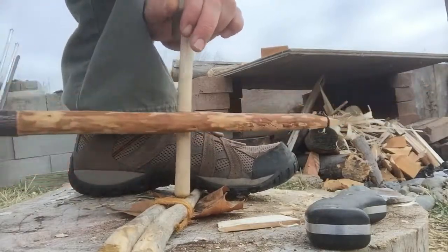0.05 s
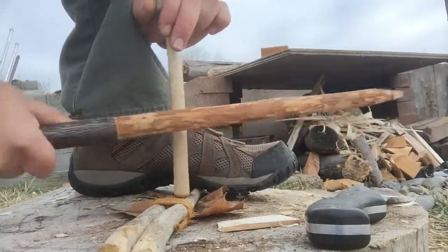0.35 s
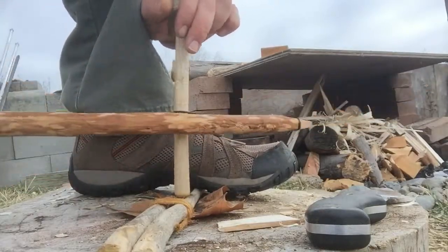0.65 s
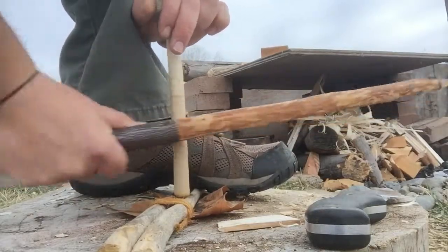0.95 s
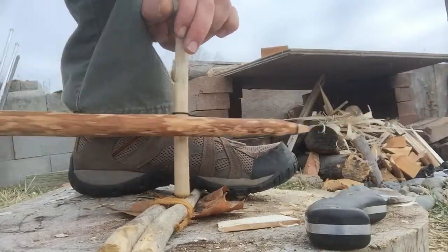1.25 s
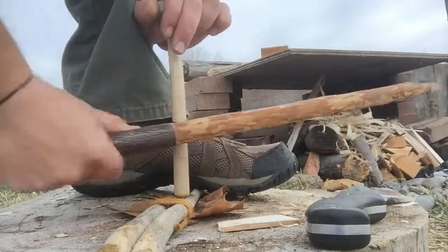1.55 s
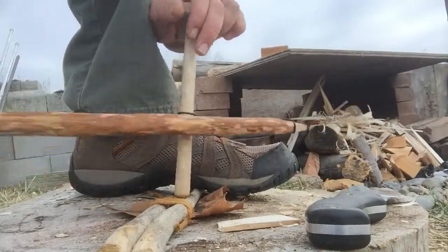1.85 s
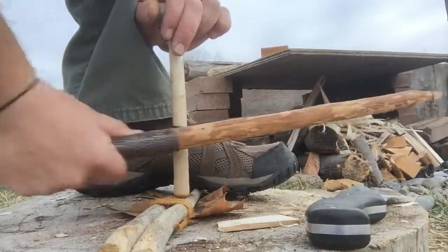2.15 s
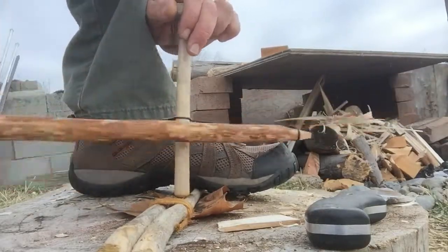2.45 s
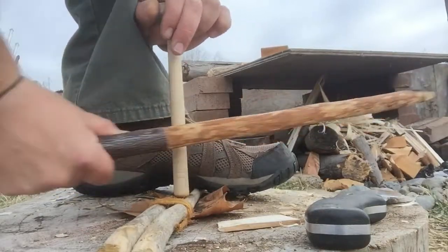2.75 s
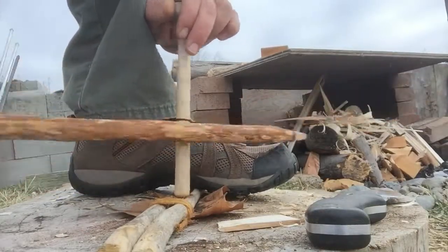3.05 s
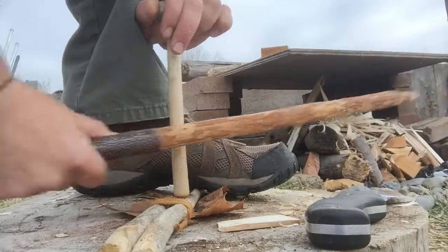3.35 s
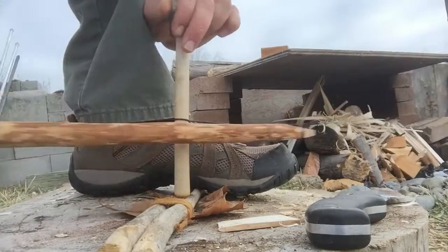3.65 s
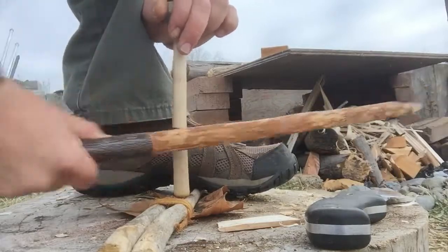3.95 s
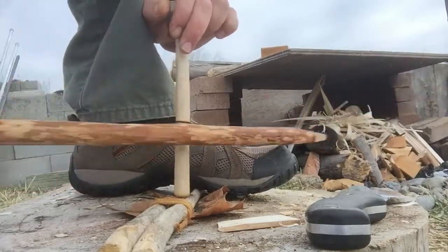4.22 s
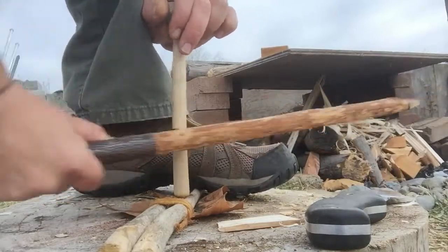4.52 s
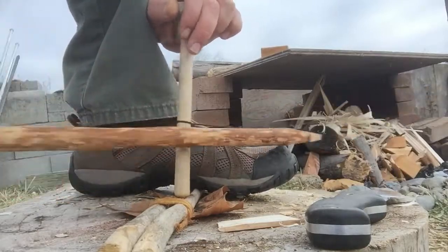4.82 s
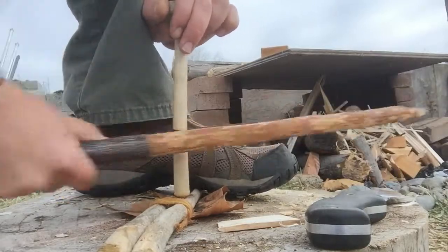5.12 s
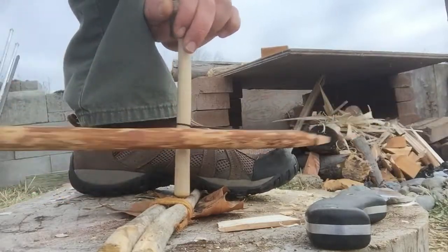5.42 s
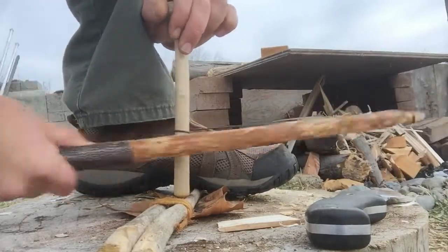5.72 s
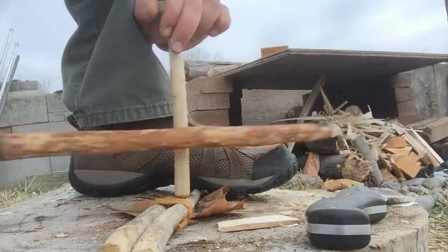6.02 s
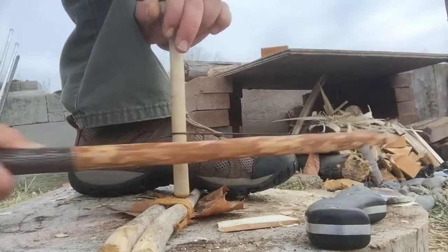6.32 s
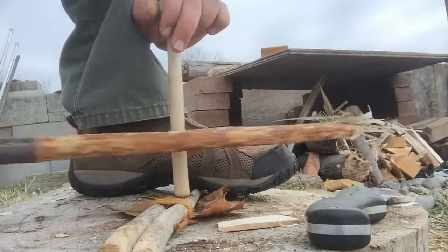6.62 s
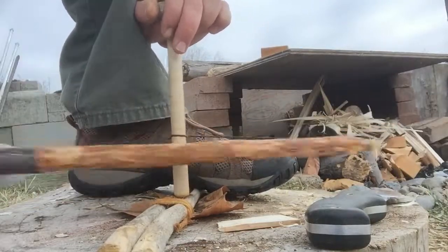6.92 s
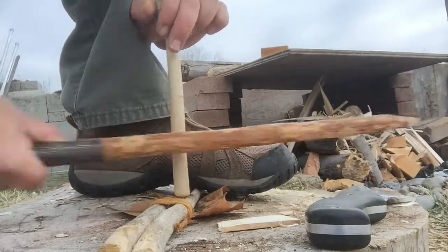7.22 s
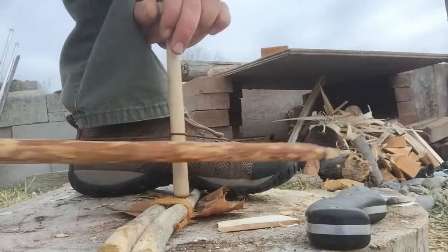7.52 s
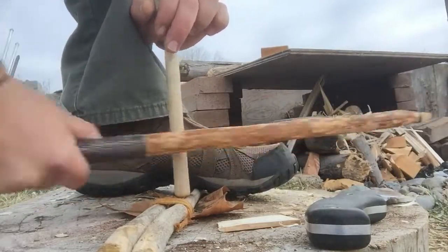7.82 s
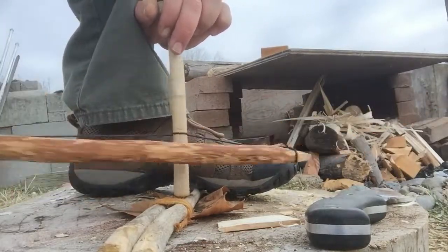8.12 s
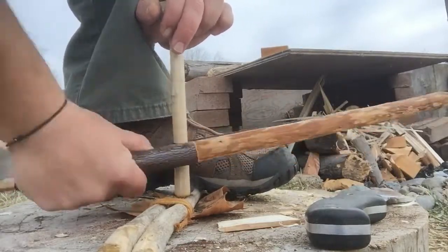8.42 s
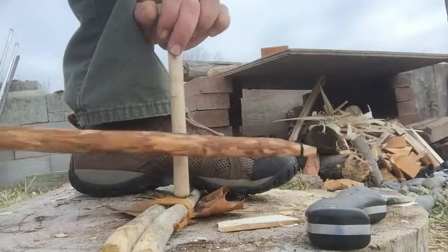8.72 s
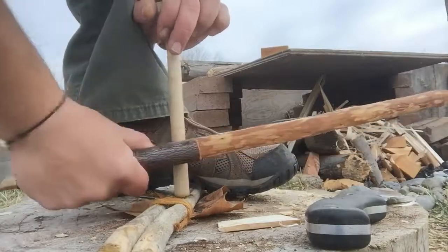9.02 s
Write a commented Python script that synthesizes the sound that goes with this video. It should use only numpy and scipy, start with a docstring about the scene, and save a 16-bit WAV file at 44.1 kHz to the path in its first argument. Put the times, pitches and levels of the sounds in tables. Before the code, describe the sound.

Close, rhythmic rasping of wood spinning on wood, with sharp squeaks that thin out and a few knocks, over faint open-air rumble.

```python
"""A bow drill, close by, over the faint low rumble of the open air. A wooden spindle starts to grind to and
fro in its board, about 3.4 strokes a second: pushes bear down harder, pulls add a soft hollow note.
At first the smooth socket squeals as the tip sticks and slips, and the drill knocks at a few turns of
the bow. Within two seconds the socket wears in to a louder, dry rasp, and the tip begins to catch.
Near 4 s the drill groans in its seat; then the squeaks thin out, and a last knock comes at 6.6 s."""
import sys
import numpy as np
from scipy import signal
from scipy.fft import rfft, irfft, next_fast_len
from scipy.io import wavfile
from scipy.ndimage import uniform_filter1d

SR = 44100
rng = np.random.default_rng(int(sys.argv[2]) if len(sys.argv) > 2 else 0)


def persist_wave(psi):
    """Save psi, clipped to +-1, as 16-bit WAV."""
    counts = np.round(np.clip(psi, -1, 1) * 32767).astype(np.int16)
    wavfile.write(sys.argv[1], SR, np.atleast_2d(counts).T)


N = 408807
TIME = np.arange(N) / SR
FFT_SIZE = next_fast_len(N + SR // 4, True)
HZ = np.fft.rfftfreq(FFT_SIZE, 1 / SR)
HIGHEST_HZ = 15950
WEAR_IN_S = 1.18  # how long the fresh socket takes to wear in


def gain_of(db):
    """Turns decibels into a number to multiply by."""
    return 10 ** (np.asarray(db) / 20)

def unit_level(x):
    """Scales a signal to an average (rms) level of 1."""
    return x / np.sqrt(np.mean(x ** 2) + 1e-20)

def curve_db(points):
    """Joins (frequency, level) points into a level for every frequency."""
    f, db = np.transpose(points)
    return np.interp(np.log(HZ + 1), np.log(f + 1), db)

def filtered(x, gain):
    """Turns each frequency up or down by its own gain."""
    return irfft(rfft(x, FFT_SIZE) * gain, FFT_SIZE)[:N]

def noise(gain):
    """Noise of level 1, coloured by a gain for each frequency."""
    return unit_level(filtered(rng.standard_normal(N), gain))

def bell(x, centre, width):
    """A smooth hump of height 1."""
    return np.exp(-np.minimum(((x - centre) / width) ** 2, 20))

def drift(rate):
    """A random wobble of level 1, up to about `rate` times a second."""
    smoothing = signal.butter(2, min(rate, 900), fs=SR / 20, output="sos")
    coarse = signal.sosfilt(smoothing, rng.standard_normal(N // 20 + 2))
    return np.interp(np.arange(N) / 20, np.arange(len(coarse)), unit_level(coarse))

def resonate(x, hz, width):
    """Makes a signal ring at a pitch that follows the curve hz."""
    turn = np.exp(2j * np.pi * np.cumsum(hz) / SR)
    decay = np.exp(-np.pi * width / SR)
    return 2 * (turn * signal.lfilter([1 - decay], [1, -decay], x / turn)).real

def add(mix, s, sound):
    """Mixes a sound in at s seconds."""
    part = mix[max(round(s * SR), 0):][:len(sound)]
    part += sound[:len(part)]


# tone colour of the outdoor rumble and hiss: f/Hz, relative level/dB
RUMBLE_COLOUR = [(15, -50.5), (25, -14), (56, 0), (76, 3.5), (123, -2), (206, -17), (260, -26.5),
                 (340, -56), (570, -120)]
HISS_COLOUR = [(100, -5.5), (250, 2), (700, -6), (1500, -6), (4000, -14.5), (9000, -21), (16000, -28.5)]

def open_air(rumble_db=-56.5, hiss_db=-67, lowest_hz=36):
    """The distance rumbles softly under a faint, dull hiss."""
    bass_cut = 1 / (1 + (lowest_hz / (HZ + 1)) ** 6)
    rumble = noise(bass_cut * gain_of(curve_db(RUMBLE_COLOUR)))
    hiss = noise(bass_cut * gain_of(curve_db(HISS_COLOUR)))
    return gain_of(rumble_db + drift(8)) * rumble + gain_of(hiss_db) * hiss


# knocks as the bow turns: t/s, peak level/dB, treble/dB, scrape length/s, scrape against blow/dB
KNOCKS = [(0.058, -52, 1, 0.002, -6), (0.694, -27.5, 4, 0.0048, 3), (1.31, -24, -2.5, 0.0037, -6),
          (3.088, -35.5, -13, 0.002, -24), (6.590, -21, -17, 0.0011, -26)]
# notes the board rings with: f/Hz, relative level/dB, time to fade by 60 dB/s
BOARD_NOTES = [(244.4, -9.5, 0.035), (407, -3.5, .022), (660, 0.5, 0.037), (870, 7, 0.024),
               (1070, -2.5, 0.028), (1230, -2, 0.017), (1970, -0.5, 0.034), (2374, 8.5, .016),
               (3100, 5, 0.017), (3430, 2, 0.024), (5740, 6.5, 0.0143), (6016, 4.5, 0.016),
               (7200, -10, .02), (8720, -22, .02)]

def knocks(crack_db=-7):
    """A blow with a short scrape sets the board ringing."""
    out, t = np.zeros(N), np.arange(SR // 5) / SR
    for s, db, treble_db, scrape_s, scrape_db in KNOCKS:
        scrape = rng.standard_normal(len(t)) * bell(t, scrape_s, 2 * scrape_s)
        blow = gain_of(scrape_db) * scrape + (t == 0)
        ring = np.zeros(len(t))
        for k, (hz, note_db, fade_s) in enumerate(BOARD_NOTES):
            fade = gain_of(note_db + treble_db * (hz > 1500) - 60 * t / fade_s)
            ring += (-1) ** k * fade * np.sin(2 * np.pi * hz * t)
        crack = gain_of(crack_db + treble_db) * unit_level(scrape)
        knock = unit_level(signal.fftconvolve(blow, ring)[:len(t)]) + crack
        add(out, s, gain_of(db) * knock / abs(knock).max())
    return out


# bow strokes, push and pull by turns: start t/s, end t/s, timing (under 1 = fastest early), effort/dB
STROKES = [(0.061, 0.358, 1.3, 0), (0.386, 0.696, 0.7, 0.5), (0.68, 0.982, 1.27, 2.5),
           (0.947, 1.291, 1.23, 0), (1.277, 1.568, 1.42, 2), (1.587, 1.929, 0.71, -0.5),
           (1.875, 2.165, 1.22, 1), (2.178, 2.489, 0.95, 1), (2.504, 2.762, 1.03, 3),
           (2.789, 3.072, 0.81, .5), (3.112, 3.363, 0.74, 2.8), (3.379, 3.669, 0.72, 0),
           (3.688, 3.957, .85, 1), (3.952, 4.285, 0.73, -0.9), (4.225, 4.531, 1.03, -0.5),
           (4.517, 4.825, 0.98, -0.6), (4.856, 5.105, 0.88, 1), (5.112, 5.407, 1.02, 0.5),
           (5.456, 5.716, 0.65, 0), (5.711, 5.995, 0.89, -.5), (6.043, 6.295, 0.73, -0.8),
           (6.294, 6.559, 1.045, 1), (6.589, 6.87, 0.81, 0), (6.854, 7.13, 1.14, 1),
           (7.15, 7.417, 0.92, 0.1), (7.431, 7.702, 0.9, 0.5), (7.702, 7.976, 0.96, -0.5),
           (7.974, 8.249, 1.31, 0.5), (8.282, 8.524, 0.8, 1), (8.542, 8.803, 0.98, 0.5),
           (8.848, 9.078, 0.8, 1.3), (9.093, 9.387, 0.85, 1)]
PUSHES, PULLS = STROKES[::2], STROKES[1::2]

def bow_motion(strokes):
    """The spindle's speed (0 to 1) rises and falls once a stroke; also gives the effort in dB."""
    speed, effort_db = np.zeros((2, N))
    for start, end, timing, db in strokes:
        now = (TIME > start) & (TIME < end)
        progress = (TIME[now] - start) / (end - start)
        speed[now] = np.sin(np.pi * progress ** timing)
        effort_db[now] = db
    return speed, effort_db

def freshness(s):
    """The socket at s seconds: 1 = fresh and smooth, 0 = worn in."""
    return bell(s, 0, WEAR_IN_S)

def grit(snaps_per_s=4200, spread_db=2.5, snap_share=0.39):
    """Fibres tear in countless tiny snaps over the smooth hiss of wood dust."""
    snaps = (rng.random(N) < snaps_per_s / SR) * rng.choice([-1, 1], N)
    snaps = snaps * gain_of(spread_db * np.minimum(rng.exponential(1, N), 4))
    return np.sqrt(snap_share) * unit_level(snaps) + np.sqrt(1 - snap_share) * rng.standard_normal(N)

def wandering_tip(x, slow_db=2.13, quick_db=3.0):
    """The tip wanders in its socket, so the tone changes from stroke to stroke and turn to turn."""
    spectra = signal.stft(x, nperseg=512, noverlap=384)[2]
    slow, quick = rng.standard_normal((2, *spectra.shape))
    slow = unit_level(uniform_filter1d(uniform_filter1d(slow, size=5, axis=0), size=70, axis=1))
    quick = unit_level(uniform_filter1d(uniform_filter1d(quick, size=3, axis=0), size=5, axis=1))
    spectra = spectra * gain_of(slow_db * slow + quick_db * quick)
    return signal.istft(spectra, nperseg=512, noverlap=384)[1][:N]


# high peaks and dips in the spindle's tone, alike both ways: f/Hz, width/Hz, level change/dB
TREBLE_PEAKS = [(6770, 260, -4), (7400, 780, 2.5), (9100, 360, -2.5), (9900, 350, 1.5), (11770, 1000, -7),
                (11650, 300, 6), (12750, 300, -4), (13600, 400, 5.5), (14450, 300, 1.5)]

def grinding(strokes, colour, peaks, fresh_db, worn_db, turns_per_s, wobble_db, lumps_db, chatter_db,
             ring_swell_db, full_speed, sing_db, shallow_db):
    """Wood rubs on wood; the uneven tip bites once a turn and slowly sinks into the board."""
    speed, effort_db = bow_motion(strokes)
    depth = np.minimum(TIME / 6.6, 1)  # fully sunk after 6.6 s
    # fresh_db and worn_db each list: overall level, board body, spindle ring, dust fizz
    level, body, ring, fizz = (gain_of(worn + (fresh - worn) * freshness(TIME))
                               for fresh, worn in zip(fresh_db, worn_db))
    turns = np.cumsum(turns_per_s * speed * (1 + .1 * drift(3.24))) / SR
    bite_db = wobble_db * np.cos(2 * np.pi * turns) + lumps_db * drift(32) + chatter_db * drift(400)
    friction = np.tanh((speed / full_speed) ** 2.21)  # levels off once the tip spins
    force = level * friction * gain_of(effort_db + bite_db)
    wood_db = curve_db(colour) + sum(db * bell(HZ, hz, width) for hz, width, db in peaks + TREBLE_PEAKS)
    rasp = unit_level(wandering_tip(filtered(grit(), gain_of(wood_db))))
    # as the tip sinks, the spindle's low bending note grows and the note it sings climbs
    rasp = rasp + (gain_of(shallow_db * (1 - depth)) - 1) * filtered(rasp, bell(HZ, 1700, 280))
    ring = ring * gain_of(ring_swell_db * (speed - 1) + 0.4 * drift(35))
    sing_hz = 2762 + (3264 - 2762) * depth ** 2.3
    sing = resonate(rng.standard_normal(N), sing_hz, width=240)
    sing = gain_of(sing_db) * unit_level(resonate(sing, sing_hz, width=240))
    board = filtered(rasp, 1 / (1 + (HZ / 1400) ** 8))
    spindle = filtered(rasp, bell(HZ, 2965, 740))
    dust = filtered(rasp, 1 / (1 + (9500 / (HZ + 1)) ** 8))
    return force * (rasp + sing + (body - 1) * board + (ring - 1) * spindle + (fizz - 1) * dust)


# tone colour of a push: f/Hz, relative level/dB
PUSH_COLOUR = [(120, -75.5), (200, -54), (316, -24.5), (366, -33.5), (612, -16), (1000, -15.5),
               (1250, -8.5), (1400, -15.5), (1770, -4), (2130, -4.5), (3190, -1), (4430, -14), (5630, -9),
               (7010, -20), (16000, -21.5)]
# peaks and dips of the wood in a push: f/Hz, width/Hz, level change/dB
PUSH_PEAKS = [(640, 100, 3.5), (1082, 79, -10), (1180, 33, 3), (1310, 160, -2.5), (1542, 31, 7.5),
              (1794, 90, 4.5), (2185, 210, -6), (2880, 116, 6), (3182, 200, 6.5), (4420, 420, -3),
              (5540, 600, -1.5)]

def pushes():
    """Pushes bear down hard, and the spindle rings more the faster it spins."""
    return grinding(PUSHES, PUSH_COLOUR, PUSH_PEAKS,
                    fresh_db=(-38.5, 1, -12, 1.5), worn_db=(-32, 3, -6, 0),
                    turns_per_s=27, wobble_db=1.83, lumps_db=0.5, chatter_db=0.4,
                    ring_swell_db=7.5, full_speed=0.81, sing_db=-12, shallow_db=-5)


def mid_stroke(margin):
    """One random moment in each stroke, away from its two ends."""
    start, end = np.transpose(STROKES)[:2]
    return start + (end - start) * (margin + (1 - 2 * margin) * rng.random(len(start)))

# the loud squeaks: peak t/s, f/Hz, level/dB, half-length/s
SQUEAKS = [(0.199, 3265, -22, 0.019), (.231, 3310, -26, 0.0094), (0.78, 3255, -33, .012),
           (0.801, 4810, -16, 0.0027), (.808, 1520, -26, 0.0068), (0.832, 1545, -13, 0.0052),
           (0.871, 1544, -7.5, .0045), (0.883, 4814, -14, 0.0032), (0.891, 1540, -23, 0.0086),
           (.915, 1566, -11, .0043), (1.399, 2815, -22, 0.0057), (1.403, 4710, -21.5, 0.0047),
           (1.418, 2700, -24, 0.01), (1.995, 2578, -9.5, .0058), (2.002, 4590, -17.5, 0.0048),
           (2.036, 4720, -19, 0.0047), (2.076, 4730, -16.5, 0.0031), (2.313, 3230, -26, 0.0042),
           (2.35, 2830, -36, 0.018), (2.602, 4690, -18, 0.0043), (2.616, 2780, -31.5, 0.022),
           (2.637, 4670, -26.5, 0.0049), (2.679, 4760, -18, 0.0051), (2.829, 3160, -21.5, 0.0032),
           (2.969, 2790, -31.5, 0.0038), (3.194, 4600, -29, 0.008), (3.224, 2880, -31, 0.019),
           (3.272, 4755, -22, 0.0047), (3.421, 3150, -31, 0.0034), (3.78, 4760, -34, 0.0057),
           (4.111, 4920, -30.5, 0.0035), (4.378, 2950, -31.5, 0.0056), (5.174, 5020, -33, 0.0059),
           (5.269, 4920, -28.5, .004), (6.156, 3150, -29, .004), (7.254, 3120, -28, 0.0038),
           (7.332, 3250, -28.5, .005), (7.852, 3250, -29, .006), (8.407, 3190, -28, 0.0032)]
# ways the spindle can squeak: f/Hz, glide as a share of the pitch, drop per overtone in a full squeal/dB
SQUEAK_KINDS = [(1540, -0.031, 3), (2700, -0.0098, 31.5), (3250, -.003, 15), (4780, .013, 8.5)]
# notes that ring on after a squeak: f/Hz, width/Hz, relative level/dB
SPINDLE_NOTES = [(1515, 45, -12), (3090, 80, -18), (4780, 80, -8)]

def squeaks(jitter=0.013, flutter_db=0.14, octave_db=5, rasp=0.037, fuzz_db=-14, fuzz_hz=420,
            full_squeal_db=-12.5, limit_db=-8, growth=1.72, tail=1.21):
    """The tip sticks and slips at one of the spindle's notes; raspy overtones grow as a squeak peaks."""
    out = np.zeros(N)
    waver = jitter * drift(300)
    flutter = gain_of(flutter_db * drift(250))
    slips = rasp * drift(800)  # uneven slips smear the high overtones most
    fuzz = gain_of(fuzz_db) * noise(bell(HZ, 0, fuzz_hz))
    for s, hz, db, half_s in SQUEAKS + closing_whistles() + faint_chirps():
        _, glide, drop_db = min(SQUEAK_KINDS, key=lambda kind: abs(kind[0] - hz))
        drop_db = drop_db + 2.32 * np.logaddexp(0, full_squeal_db - db)  # quieter squeaks are purer
        now = slice(max(int((s - 4 * half_s) * SR), 0), int((s + 5 * half_s) * SR))
        t = TIME[now] - s
        rough = min(1, 0.0048 / half_s)  # long squeaks settle on their note, short ones stay rough
        swell = 1 / np.cosh(growth * t / half_s / np.where(t > 0, tail, 1))
        squash = np.hypot(1, gain_of(db - limit_db) * swell ** 2)  # the loudest slips hit a ceiling
        height = flutter[now] * (1 + rough * fuzz[now]) / squash
        pitch_hz = hz * (1 + glide * np.tanh(t / half_s) + rough * waver[now])
        phase = 2 * np.pi * np.cumsum(pitch_hz) / SR + rough * slips[now]
        for k in range(1, int(HIGHEST_HZ / hz) + 1):
            overtone_db = -drop_db * (k - 1) ** 1.066 + octave_db * (k == 2)
            out[now] += gain_of(db + overtone_db) * height * swell ** ((k + 1) / 2) * np.sin(k * phase)
    ringing = sum(gain_of(db) / (1 + 2j * (HZ - hz) / width) for hz, width, db in SPINDLE_NOTES)
    bass_cut = 1 / (1 + (1150 / (HZ + 1)) ** 10)  # a thin spindle gives off little below its lowest note
    return filtered(out, bass_cut * (1 + ringing))

def closing_whistles(until_s=2.3, before_stop_s=0.039, hz=3345, db=-36, half_s=.01):
    """Lists the thin squeaks that come as each early push slows to a stop."""
    return [(end - before_stop_s, hz, db, half_s) for _, end, *_ in PUSHES if end < until_s]


# tone colour of a pull: f/Hz, relative level/dB
PULL_COLOUR = [(150, -55), (250, -30.5), (342, -3), (476, -13.5), (597, -9.5), (1080, -0.5), (1760, 0),
               (2240, -2.5), (2910, 0), (5630, -3.5), (6590, -9.5), (7440, -8.5), (16000, -18)]
# peaks and dips of the wood in a pull: f/Hz, width/Hz, level change/dB
PULL_PEAKS = [(583, 93, 11), (862, 100, 4), (1020, 51, -7), (1460, 77, 0), (1792, 61, 4.5), (2040, 150, -1),
              (2950, 58, -1), (4300, 330, -1.5), (5020, 96, 4.5), (5580, 600, 4.5)]

def pulls():
    """Pulls press more lightly and spin the spindle back faster."""
    return grinding(PULLS, PULL_COLOUR, PULL_PEAKS,
                    fresh_db=(-53.5, 3, 2, 10), worn_db=(-40, -0.6, 2.5, 2.5),
                    turns_per_s=35, wobble_db=2, lumps_db=0.2, chatter_db=-1.2,
                    ring_swell_db=-3.5, full_speed=0.72, sing_db=-14, shallow_db=-1)


# the hollow notes that swell up louder: t/s at the lowest pitch, level/dB
LOUD_HOLLOWS = [(2.371, -53.5), (5.31, -50.5), (8.15, -52)]

def hollow_notes(fresh_hz=580, worn_hz=358, width_hz=45, soft_db=-59.5, half_s=0.052, slide_s=0.0774):
    """Each pull's rasp wakes a low note that slides down as the bow travels, then turns back up."""
    out, t = np.zeros(N), np.arange(-SR // 7, SR // 10) / SR
    swell = bell(t, -0.0043, half_s) * signal.windows.tukey(len(t), .3)
    bend = (t / slide_s) ** 2
    soft = [(start + 0.66 * (end - start), soft_db + 2 * rng.standard_normal())
            for start, end, *_ in PULLS]
    for s, db in LOUD_HOLLOWS + soft:
        lowest_hz = (worn_hz + (fresh_hz - worn_hz) * freshness(s)) * (1 + 0.049 * rng.standard_normal())
        hz = lowest_hz * (1 + bend / (1 + bend))
        note = resonate(resonate(rng.standard_normal(len(t)), hz, 2 * width_hz), hz, width_hz)
        add(out, s + t[0], gain_of(db) * unit_level(note) * swell)
    return out


# the hardest catches of the tip: t/s, level/dB
HARD_CATCHES = [(1.385, -35.5), (3.825, -33), (4.63, -34.5), (4.731, -37.5), (6.65, -36.5), (6.691, -36),
                (7.251, -32), (7.762, -39), (8.403, -29.5)]
# tone colour of a catch: f/Hz, width/Hz, relative level/dB
CATCH_COLOUR = [(1560, 160, 3.5), (1805, 150, 6), (3070, 220, 6.5), (4500, 4100, -18)]

def catches(light_db=-41.5, spread_db=2, half_s=.005):
    """Short bites rasp the spindle's lowest notes; the worn tip also catches lightly once a stroke."""
    force, t = np.zeros(N), np.arange(-SR // 40, SR // 40) / SR
    light = [(s, light_db + spread_db * rng.standard_normal())
             for s in mid_stroke(margin=.15) if s > WEAR_IN_S]
    for s, db in HARD_CATCHES + light:
        add(force, s + t[0], gain_of(db) * bell(t, 0, half_s))
    return force * noise(sum(gain_of(db) * bell(HZ, hz, width) for hz, width, db in CATCH_COLOUR))


def faint_chirps(hz=4830, climb_hz_per_s=90, db=-37.5, spread_db=1.8, half_s=0.0033,
                 loudest_s=4.0, span_s=1.6, per_stroke=3):
    """Lists small random squeaks as the squealing dies out; their pitch creeps up with wear."""
    times = np.concatenate([mid_stroke(margin=.27) for _ in range(per_stroke)])
    levels = db + spread_db * rng.standard_normal(len(times))
    levels += 20 * np.log10(bell(times, loudest_s, span_s))
    return [(s, hz + climb_hz_per_s * (s - loudest_s), level, half_s)
            for s, level in zip(times, levels) if abs(s - loudest_s) < span_s]


# soft scuffs as the drill settles: t/s, half-length/s, f/Hz, width/Hz, level/dB
SCUFFS = [(3.98, 0.041, 306.6, 130.5, -50), (4.244, 0.028, 1720, 513, -44.5)]

def groan(start_s=3.912, length_s=0.15, hz=152, db=-47.5):
    """The drill shifts in its seat with a short, low wooden groan and two scuffs."""
    out, t = np.zeros(N), np.arange(int(length_s * SR)) / SR
    add(out, start_s, gain_of(db) * signal.windows.tukey(len(t), .3) * np.sin(2 * np.pi * hz * t))
    for s, half_s, centre_hz, width_hz, scuff_db in SCUFFS:
        scuff = noise(bell(HZ, centre_hz, width_hz))
        out += gain_of(scuff_db + 2 * drift(80)) * bell(TIME, s, half_s) * scuff
    return out


def yard_echo(x, echo_db=-20, fade_s=0.065, echoes_per_s=2000):
    """Adds weak, short echoes off a stump, a boot and a woodpile."""
    t = np.arange(SR // 4) / SR
    echoes = rng.standard_normal(len(t)) * (rng.random(len(t)) < echoes_per_s / SR)
    echoes *= (t > .002) * gain_of(-60 * t / fade_s)
    return x + gain_of(echo_db) * signal.fftconvolve(x, echoes / np.linalg.norm(echoes))[:N]

def scene():
    """Mixes the drill, its squeaks and the open air into one channel."""
    drill = pushes() + pulls() + hollow_notes() + catches() + knocks() + groan()
    return (yard_echo(drill) + squeaks() + open_air())[None]

def record(dry):
    """Cuts off the very highest treble."""
    treble_cut = signal.firwin(511, HIGHEST_HZ, window=("kaiser", 9), fs=SR)
    return signal.oaconvolve(dry, treble_cut[None], "same")


dry = scene()
out = record(dry)
persist_wave(out)
```